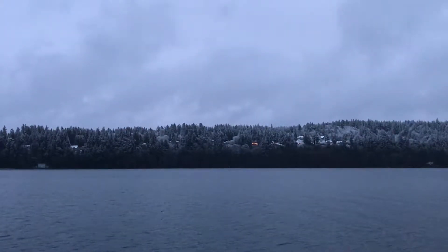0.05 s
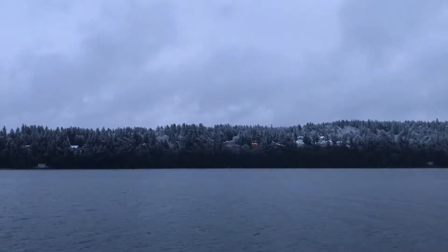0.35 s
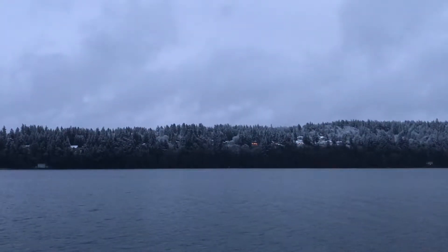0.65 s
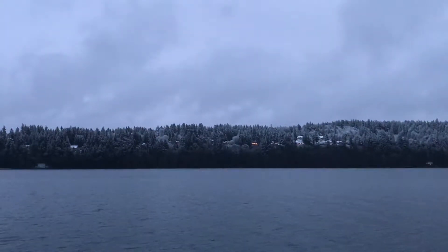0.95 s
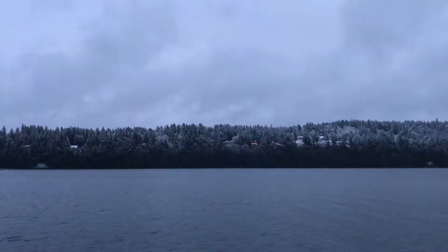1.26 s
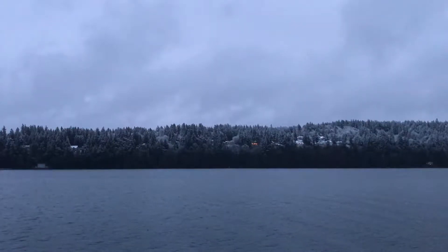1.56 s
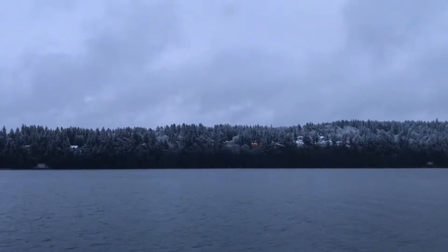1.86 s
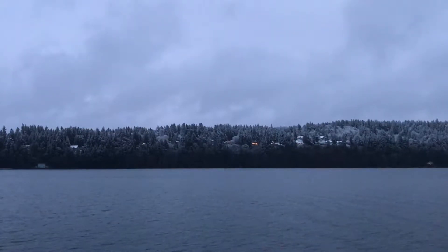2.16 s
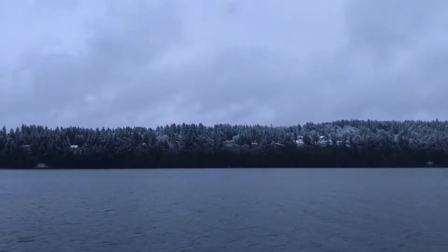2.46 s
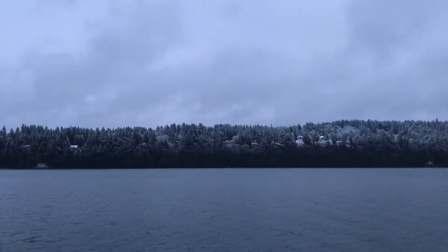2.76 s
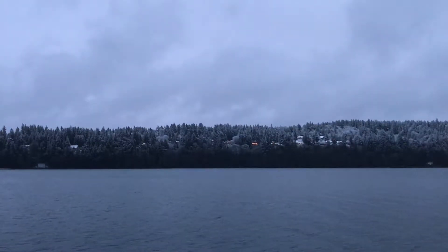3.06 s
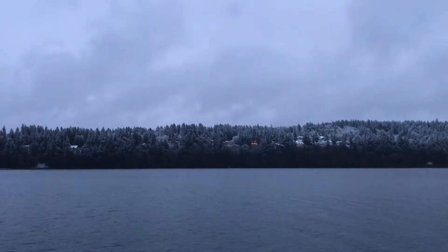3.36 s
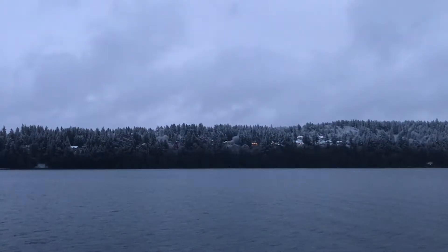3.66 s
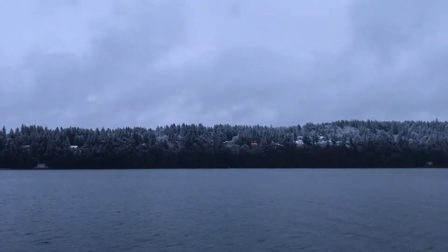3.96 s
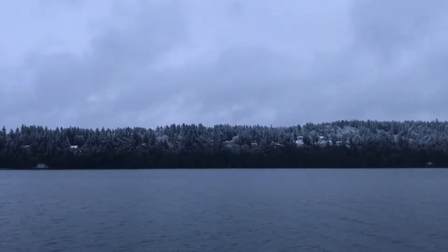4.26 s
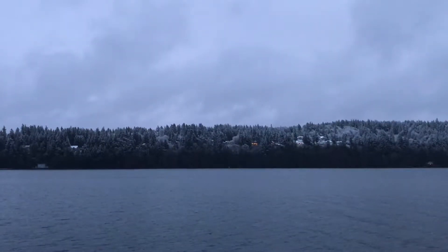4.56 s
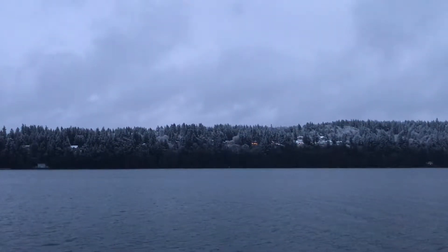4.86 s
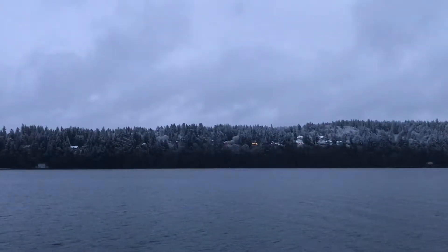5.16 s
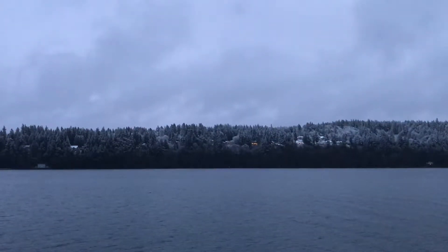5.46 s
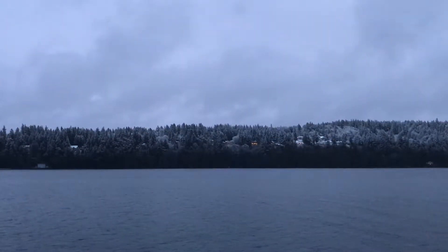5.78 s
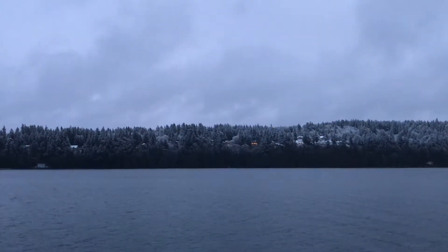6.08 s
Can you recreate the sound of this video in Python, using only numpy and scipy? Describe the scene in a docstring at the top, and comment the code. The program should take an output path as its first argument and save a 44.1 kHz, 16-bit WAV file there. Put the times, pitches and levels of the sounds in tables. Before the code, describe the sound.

A brief, bright click sounds at the very start, along with a few low puffs of wind on the microphone. Small waves lap at the shore close by, swelling from about 0.5 to 1.3 seconds with a soft wash, a foamy fizz and several bubbly plops. The water quietens around 2 seconds, leaving scattered drips and small gurgles. From about 2.7 seconds gentle waves come in one after another, with clearer plops between 4.5 and 5.1 seconds, and a last soft wash arrives around 6 seconds. Light wind rumbles unevenly on the microphone throughout, with short, dull buffets near 1, 2.4, 2.8, 3.5, 4.3 and 5.4 seconds, then eases. Tiny ticks of spray land here and there, and the open water murmurs faintly and steadily behind it all.

```python
"""The shore of a wide, cold inlet, where small waves lap after a brief, bright click at the very start.
Each wave entrains a cloud of tiny bubbles, each a damped oscillator whose pitch is higher the smaller
it is. Single large bubbles plop, closing air pockets gurgle upward, and drops of spray tick on impact.
Open water murmurs beyond, while the turbulent pressure of a light, gusty wind buffets the microphone."""
import sys
import numpy as np
from scipy import signal
from scipy.fft import rfft, irfft, next_fast_len
from scipy.io import wavfile
from scipy.ndimage import uniform_filter1d

SR = 44100
rng = np.random.default_rng(int(sys.argv[2]) if len(sys.argv) > 2 else 0)


def transcribe(signal):
    """Save signal, clipped to [-1, 1], as a 16-bit WAV file at the path in sys.argv[1]."""
    frames = np.atleast_2d(signal).T
    limited = np.clip(frames, -1, 1)
    pcm = np.round(limited * 32767).astype(np.int16)
    wavfile.write(sys.argv[1], SR, pcm)


N = 278712
TIME = np.arange(N) / SR

# Levels are relative; each source adds its own gain.
# A brief, bright click at the very start (first row), then the waves:
# peak t/s, 20 dB rise/s, 20 dB fall/s, wash level/dB, fizz level/dB
CLICK_AND_WAVES = [(0.0, .1, 0.05, -50.5, -44), (0.6, .5, .55, -47, -49), (0.881, 0.35, 0.43, -47, -53),
                   (1.101, .11, 0.35, -50, -55), (1.329, 0.14, 1.25, -52, -61.5),
                   (2.07, 0.15, 0.12, -59.5, -80), (2.698, .42, 0.45, -53, -60.5),
                   (2.98, .33, 0.39, -52, -55.5), (3.27, .25, .3, -52.5, -58), (3.709, .24, 0.73, -52, -54),
                   (3.98, 0.3, .6, -52.5, -57), (4.33, .25, 0.39, -54, -55), (4.55, .2, .42, -51.5, -54),
                   (4.84, 0.18, 0.33, -56, -53.5), (4.97, 0.15, 0.3, -50, -53.5),
                   (5.16, 0.3, 0.078, -51, -72.5), (5.56, 0.11, .8, -56.5, -62),
                   (5.96, 0.23, .6, -53, -58.5), (6.2, 0.42, 0.88, -56, -69)]
# Spectral envelopes of the water sounds: f/Hz, level/dB
WASH_SPECTRUM = [(150, -27), (300, -11), (480, -7), (650, -0.5), (900, -1.5), (1150, 1), (1600, -2),
                 (2200, -9.5), (3200, -11.5), (5000, -29)]
SLOSH_SPECTRUM = [(120, -18), (220, -8), (330, -3), (450, -5), (700, -16.5), (1400, -35.5)]
FIZZ_SPECTRUM = [(1200, -8.5), (2200, 5.5), (3000, 1.5), (4300, 1), (4950, -5), (5600, -2.5), (7600, -11.5),
                 (8700, -8.5), (9800, -10), (10400, -17.5), (11100, -11.5), (15800, -13.5)]
FAR_WATER_SPECTRUM = [(100, 12), (400, -20), (1100, 2.5), (2500, -7), (6000, -15.5), (16000, -27.5)]
# Spectral envelopes of the turbulence: f/Hz, level/dB
LARGE_EDDY_SPECTRUM = [(20, -27.5), (30, -27.5), (45, 1), (65, 1.5), (85, 0), (110, -8.5), (160, -31.5),
                       (220, -48.5), (400, -59), (800, -69.5)]
SMALL_EDDY_SPECTRUM = [(70, -29), (120, 7), (170, 3), (230, -10.5), (400, -23), (900, -56)]
# Breeze between the gusts: t/s, large-eddy level/dB
BREEZE = [(0.0, -42), (1.3, -44.5), (3.1, -49), (3.95, -54), (4.45, -58), (5.2, -48.5), (6.32, -52.5)]
# Gusts: t/s, hold/s, large-eddy level/dB, small-eddy level/dB
GUSTS = [(0.0, 0.13, -31.5, -33.5), (0.183, 0.015, -28.5, -36), (0.264, 0.033, -32.5, -42),
         (0.413, 0.043, -29.5, -34.5), (0.515, 0.16, -42.5, -47), (1.003, 0.028, -32.5, -39.5),
         (1.07, .12, -39, -47), (1.56, 0.086, -33, -45), (1.67, .13, -38.5, -52.5),
         (1.836, 0.078, -30.5, -48.5), (1.914, 0.12, -34.5, -54), (2.106, 0.034, -35.5, -45.5),
         (2.27, 0.097, -35, -56), (2.413, .035, -30.5, -48), (2.625, 0.026, -30.5, -46),
         (2.69, 0.065, -37, -50), (2.791, 0.048, -27, -43), (2.927, 0.047, -32, -43),
         (3.169, 0.021, -33.5, -50), (3.318, 0.037, -33.5, -60), (3.375, 0.081, -30.5, -39),
         (3.529, 0.049, -26.5, -36.5), (3.669, 0.052, -28, -44.5), (3.79, 0.036, -32.5, -48),
         (3.917, .015, -41, -62), (4.065, 0.011, -46.5, -44.5), (4.171, 0.071, -38, -43.5),
         (4.345, 0.024, -30.5, -46), (4.51, 0.014, -37, -69), (4.611, 0.018, -36, -48),
         (4.706, 0.097, -38, -52.5), (4.956, 0.18, -37, -48.5), (5.252, 0.012, -36, -50),
         (5.328, 0.075, -29.5, -41), (5.42, 0.066, -28, -47.5), (5.575, 0.082, -38.5, -54.5),
         (5.867, 0.045, -42, -68), (5.996, 0.052, -40, -58)]
# Single eddies striking the microphone: t/s, initial f/Hz, level/dB, duration/s
PUFFS = [(.05, 385, -29, 0.014), (.087, 377, -24, 0.028), (.275, 370, -33.5, .02), (.404, 300, -36, 0.031),
         (1.064, 148, -22.5, 0.026), (1.9, 226, -34.5, .025), (2.418, 163, -27, 0.038),
         (2.758, 185, -21.5, 0.035), (3.424, 185, -27, 0.043), (3.542, 343, -39, 0.034),
         (3.803, 265, -36, 0.058), (4.346, 135, -15.5, 0.051), (5.358, 180, -20.5, 0.037)]
# Single bubbles: t/s, f/Hz, level/dB, 60 dB decay/cycles
PLOPS = [(.168, 3700, -38, 15), (.262, 4640, -28.5, 9.5), (.485, 4200, -30, 14), (0.544, 1420, -30, 22),
         (0.599, 3400, -28, 12), (.754, 1670, -27.5, 15), (.851, 716, -34, 15), (0.877, 3230, -30, 10),
         (.934, 1150, -26, 29), (1.088, 1170, -26.5, 24), (1.175, 796, -35.5, 19), (1.315, 780, -38.5, 39),
         (1.441, 1320, -35.5, 24), (2.087, 1340, -37.5, 21), (2.178, 1720, -40, 35), (2.493, 900, -36, 18),
         (2.539, 2500, -39, 44), (2.582, 2380, -35.5, 27), (2.68, 1340, -42, 20), (2.738, 2980, -40.5, 50),
         (2.994, 1160, -35, 22), (3.341, 1170, -36.5, 44), (3.464, 790, -37.5, 24),
         (3.685, 5400, -20.5, 4.7), (3.929, 5000, -41, 50), (3.961, 2750, -41, 35), (4.101, 2780, -36, 30),
         (4.12, 3340, -36, 46), (4.336, 2520, -37, 30), (4.506, 4660, -36, 62), (4.559, 1680, -24.5, 20),
         (4.671, 1200, -27.5, 19), (4.925, 1410, -26, 14), (4.986, 670, -36, 18), (5.057, 1600, -28, 14),
         (5.572, 8700, -45.5, 100), (5.717, 4490, -34.5, 14), (5.762, 640, -39, 9),
         (5.769, 314, -36.5, 9.6), (5.904, 920, -37.5, 21), (5.996, 1540, -36, 24),
         (6.093, 3400, -30.5, 16), (6.166, 684, -39, 27), (6.238, 3360, -40, 55), (6.254, 1000, -31.5, 17)]
# Drops of spray: t/s, level/dB
SPRAY = [(.4135, -38), (.574, -43), (.965, -40), (1.561, -43.5), (2.046, -45), (2.7875, -40), (3.010, -42),
         (3.128, -41), (3.988, -42), (4.071, -40), (4.111, -40), (4.352, -47), (4.842, -33), (5.689, -42),
         (6.224, -41.5)]
# Air pockets under a wave's lip: t/s, duration/s, initial f/Hz, level/dB
GURGLES = [(1.109, 0.029, 754, -48), (1.356, 0.024, 1930, -48), (2.281, .034, 820, -51),
           (2.367, 0.038, 993, -55), (4.109, 0.0154, 2736, -52), (4.598, 0.0245, 2030, -48),
           (4.622, 0.017, 774, -48.5), (5.155, 0.036, 1013, -44.5), (5.174, 0.0094, 2350, -45)]


def from_db(db):
    """Amplitude ratio: a factor of ten for every 20 dB."""
    return 10 ** (np.asarray(db) / 20)


def rms_one(x):
    """Normalisation to unit mean power."""
    return x / np.sqrt(np.mean(x ** 2) + 1e-20)


def incoherent_sum(levels_db):
    """Uncorrelated sounds add in power; the result is in dB."""
    return 10 * np.log10(sum(from_db(db) ** 2 for db in levels_db) + 1e-20)


def coloured(x, spectrum):
    """Minimum-phase filtering imposes a spectral envelope causally; the result has unit rms."""
    size = next_fast_len(N + SR // 2, True)
    size += size % 2
    hz, db = np.transpose(spectrum)
    bin_hz = np.fft.rfftfreq(size, 1 / SR)
    log_gain = np.log(from_db(np.interp(np.log(bin_hz + 1), np.log(hz), db)))
    cepstrum = irfft(log_gain)[:size // 2]
    response = np.exp(rfft(2 * cepstrum, size) - cepstrum[0])
    return rms_one(irfft(rfft(x, size) * response)[:N])


def drift(corner_hz):
    """Low-pass filtered noise gives a slow random fluctuation of unit rms."""
    pole = np.exp(-2 * np.pi * corner_hz * 40 / SR)   # one step per 40 samples
    noise = rng.standard_normal(N // 40 + 2002)
    slow = signal.lfilter([1], [1, -2 * pole, pole * pole], noise)[2000:]
    return np.interp(np.arange(N) / 40, np.arange(len(slow)), rms_one(slow))


def add(out, start, sound):
    """Linear superposition of a sound from a start time in seconds."""
    i = int(np.clip(start * SR, 0, N - 1))
    out[i:i + len(sound)] += sound[:N - i]


def click_and_wave_levels():
    """The opening click and each wave decay exponentially; powers add to wash and fizz levels in dB."""
    washes, fizzes = [-57.5], [-58.5]   # ripples lap between the waves
    for peak, rise, fall, wash_db, fizz_db in CLICK_AND_WAVES:
        swelling = (np.maximum(peak - TIME, 0) / rise) ** 2
        fading = np.maximum(TIME - peak, 0) / fall
        shape_db = -20 * (swelling + fading)
        washes.append(wash_db + shape_db)
        fizzes.append(fizz_db + shape_db)
    return incoherent_sum(washes), incoherent_sum(fizzes)


def bubble_cloud(base_per_s, low_hz, high_hz, cycles, spread_db, clump_db, busy_db=0):
    """Random impulses excite bubble resonances; busy_db raises their rate at constant power."""
    chance, out = rng.random(N), np.zeros(N)
    strength_db = spread_db * np.minimum(rng.exponential(1, N), 4) - busy_db / 2
    strengths = from_db(strength_db) * rng.choice([-1, 1], N)
    pitches = np.geomspace(low_hz, high_hz, num=48)
    pitch_index = rng.integers(0, len(pitches), N)
    for k, hz in enumerate(pitches):
        if k % 12 == 0:   # bubbles of like size come in clumps
            births = chance < base_per_s / SR * from_db(busy_db + clump_db * drift(18))
        impulses = strengths * births * (pitch_index == k)
        decay, omega = from_db(-60 * hz / (cycles * SR)), 2 * np.pi * hz / SR
        ring = signal.lfilter([1], [1, -2 * decay * np.cos(omega), decay * decay], impulses + 1e-18)
        out += np.sqrt(hz) * rms_one(np.diff(ring, prepend=0))   # equal power per Hz
    return rms_one(out)


def wash(busy_db, hiss_db):
    """Millimetre-sized bubbles resonate over the broadband rush of moving water."""
    cloud = bubble_cloud(base_per_s=800, low_hz=333.3, high_hz=3553, cycles=26.5,
                         spread_db=2.0, clump_db=4.5, busy_db=busy_db)
    rush = rng.standard_normal(N) * from_db(drift(28))
    return coloured(cloud + from_db(hiss_db) * rush, WASH_SPECTRUM)


def slosh(wash_db, gain_db, growth):
    """Resonant frequency varies inversely with radius: the large bubbles of bigger waves sound low."""
    cloud = bubble_cloud(base_per_s=390, low_hz=180, high_hz=723, cycles=19, spread_db=1.5, clump_db=3.5)
    return from_db(gain_db + growth * (wash_db - wash_db.max())) * coloured(cloud, SLOSH_SPECTRUM)


def fizz(busy_db, hiss_db, crackle_db):
    """In foam, tiny bubbles resonate high and bursting films emit strongly damped transients."""
    cloud = bubble_cloud(base_per_s=1500, low_hz=1735, high_hz=15700, cycles=45,
                         spread_db=3.5, clump_db=5.0, busy_db=busy_db)
    crackle = bubble_cloud(base_per_s=170, low_hz=6000, high_hz=15000, cycles=7.3,
                           spread_db=5.5, clump_db=0, busy_db=busy_db)
    foam = cloud + from_db(crackle_db) * crackle + from_db(hiss_db) * rng.standard_normal(N)
    return coloured(foam, FIZZ_SPECTRUM) * from_db(0.97 * drift(24))


def far_water(gain_db):
    """Many incoherent sources on the open water merge into steady Gaussian noise."""
    return from_db(gain_db) * coloured(rng.standard_normal(N), FAR_WATER_SPECTRUM)


def gust_levels(rise_db_per_s=418, fall_db_per_s=520):
    """Gusts add in power to the breeze, giving the levels of large and small eddies in dB."""
    breeze_db = np.interp(TIME, *np.transpose(BREEZE))
    large, small = [breeze_db], [breeze_db - 15]
    for start, hold, large_db, small_db in GUSTS:
        before, after = np.maximum(start - TIME, 0), np.maximum(TIME - start - hold, 0)
        shape_db = -rise_db_per_s * before - fall_db_per_s * after
        large.append(large_db + shape_db)
        small.append(small_db + shape_db)
    return incoherent_sum(large), incoherent_sum(small)


def wind(rumble_db, eddy_db, flutter_db):
    """Turbulent pressure fluctuations: large eddies rumble throughout, small ones burst with gusts."""
    large_db, small_db = gust_levels()
    out = np.zeros(N)
    for spectrum, db in ((LARGE_EDDY_SPECTRUM, large_db + rumble_db),
                         (SMALL_EDDY_SPECTRUM, small_db + eddy_db)):
        swirl = coloured(rng.standard_normal(N), spectrum)
        swirl /= np.sqrt(uniform_filter1d(swirl ** 2, size=2600) + 0.011)   # even out its own swells
        out += from_db(db + flutter_db * drift(33)) * swirl
    return out


def puffs(gain_db, skew, end_pitch_ratio):
    """A passing eddy is a pressure oscillation that slows, and swells faster than it fades."""
    out = np.zeros(N)
    for start, hz, db, duration in PUFFS:
        progress = np.linspace(0, 1, int(duration * SR) + 2)
        swing = np.sin(2 * np.pi * np.cumsum(hz * end_pitch_ratio ** progress) / SR)
        envelope = np.sin(np.pi * progress ** skew) ** 2
        add(out, start, from_db(db + gain_db) * envelope * swing)
    return out


def plops(pitch_rise, gain_db):
    """A single bubble at the water's edge rings as a damped oscillator, rising slightly in pitch."""
    out = np.zeros(N)
    for start, hz, db, cycles in PLOPS:
        t60 = cycles / hz
        t = TIME[:int(t60 * SR) + 2]
        envelope = (1 - np.exp(-t * hz * 2)) * from_db(-60 * t / t60)
        ring = np.sin(2 * np.pi * hz * t * (1 + pitch_rise * t / t60 / 2))
        add(out, start, from_db(db + gain_db) * envelope * ring)
    return out


def spray(decay_s, band_hz, gain_db):
    """A brief impact has a broad spectrum: each drop lands with a bright tick."""
    out, t = np.zeros(N), TIME[:SR // 100]
    band = signal.butter(2, band_hz, "band", fs=SR, output="sos")
    for start, db in SPRAY:
        tick = signal.sosfilt(band, rng.standard_normal(len(t)) * np.exp(-t / decay_s))
        add(out, start, from_db(db + gain_db) * tick / np.abs(tick).max())
    return out


def gurgles(end_pitch_ratio, level_jitter, pitch_jitter, gain_db):
    """An air pocket rings unevenly, and its resonant frequency rises as its volume shrinks."""
    out, shake, wobble = np.zeros(N), drift(110), drift(176)
    for start, duration, start_hz, db in GURGLES:
        progress = np.linspace(0, 1, int(duration * SR) + 2)
        span = slice(int(start * SR), int(start * SR) + len(progress))
        hz = start_hz * end_pitch_ratio ** progress * (1 + pitch_jitter * wobble[span])
        envelope = np.sin(np.pi * progress) * (1 + level_jitter * shake[span])
        add(out, start, from_db(db + gain_db) * envelope * np.sin(2 * np.pi * np.cumsum(hz) / SR))
    return out


def scene():
    """The opening click, shore waves, open water and wind superpose at one microphone."""
    wash_db, fizz_db = click_and_wave_levels()
    busy_db = 1.9 * (wash_db - wash_db.mean())   # a louder wash holds more bubbles
    body = from_db(wash_db + 1.3) * wash(busy_db, hiss_db=4.0)
    body += slosh(wash_db, gain_db=-54, growth=1.86)
    foam = from_db(fizz_db - 1.0) * fizz(busy_db, hiss_db=1.0, crackle_db=-4.5)
    splashes = plops(pitch_rise=0.03, gain_db=-0.5)
    splashes += gurgles(end_pitch_ratio=1.4, level_jitter=0.4, pitch_jitter=0.05, gain_db=2)
    splashes += spray(decay_s=0.00023, band_hz=(6800, 14000), gain_db=1.5)
    far = far_water(gain_db=-56.5)
    air = wind(rumble_db=0.5, eddy_db=-2, flutter_db=2.5)
    air += puffs(gain_db=-4, skew=0.42, end_pitch_ratio=0.19)
    return (body + foam + splashes + far + air)[None]


def record(dry):
    """Band limiting: the microphone drops the deepest rumble, and the highest treble is cut."""
    thinned = signal.sosfilt(signal.butter(2, 24, "high", fs=SR, output="sos"), dry)
    return signal.sosfilt(signal.ellip(12, .1, 90, 15900, fs=SR, output="sos"), thinned)


dry = scene()
out = record(dry)
transcribe(out)
```